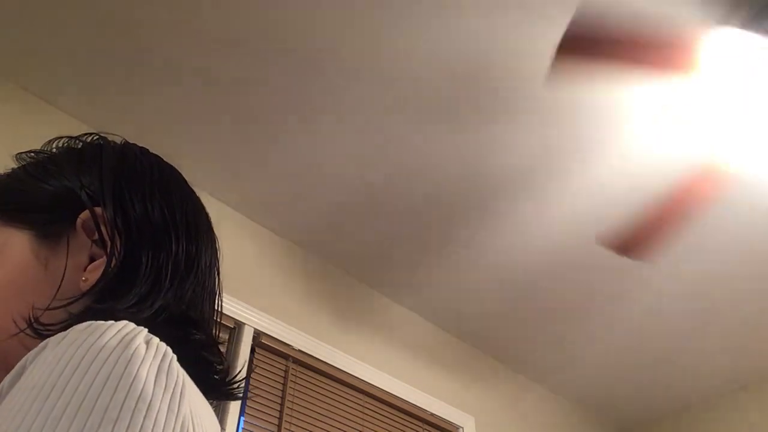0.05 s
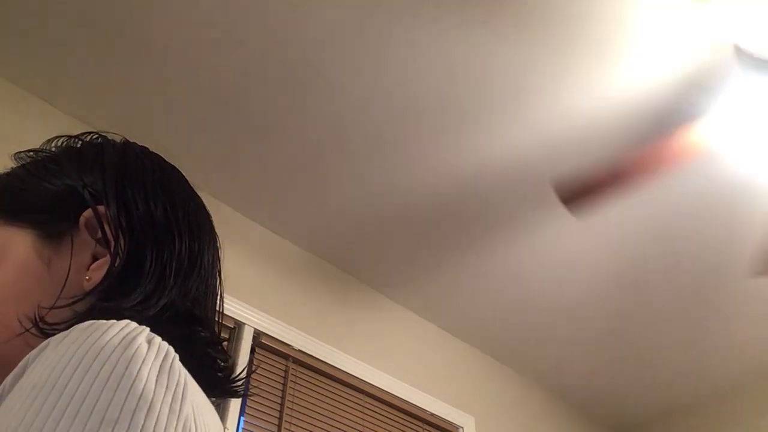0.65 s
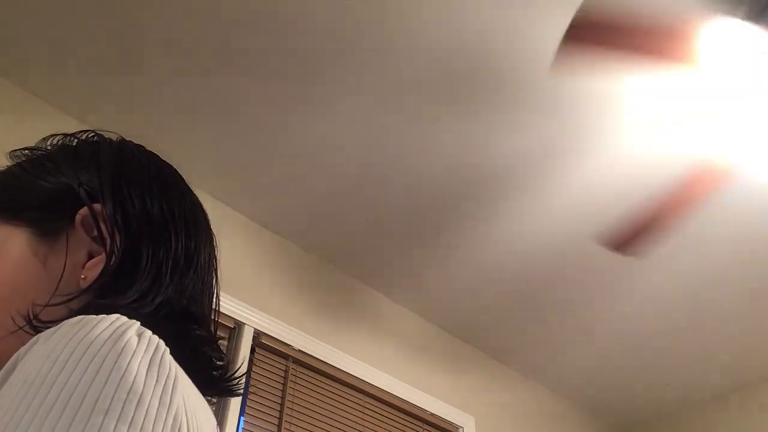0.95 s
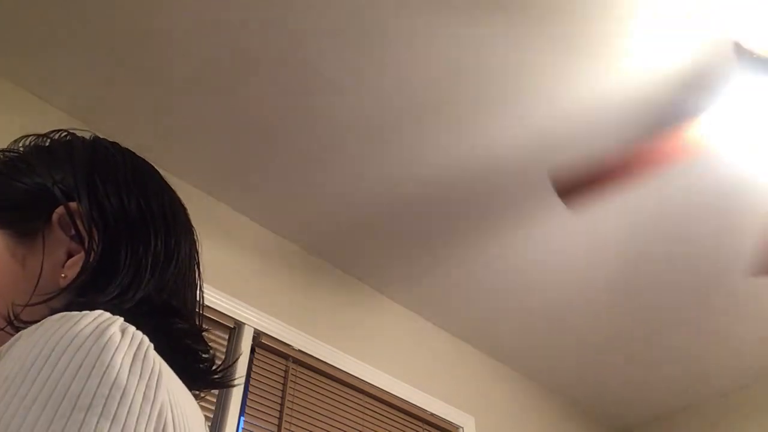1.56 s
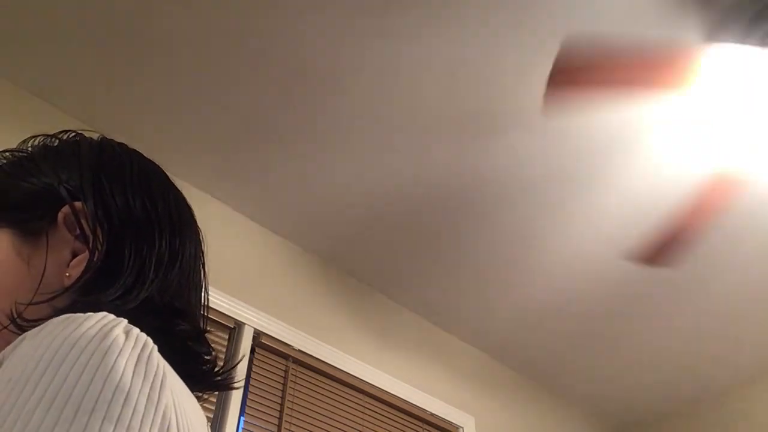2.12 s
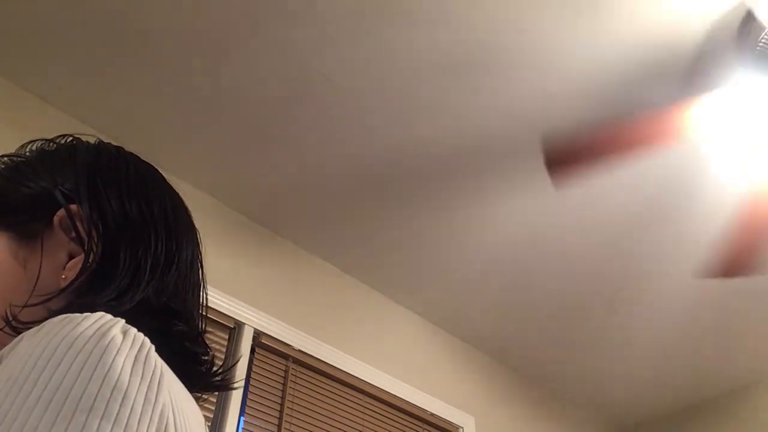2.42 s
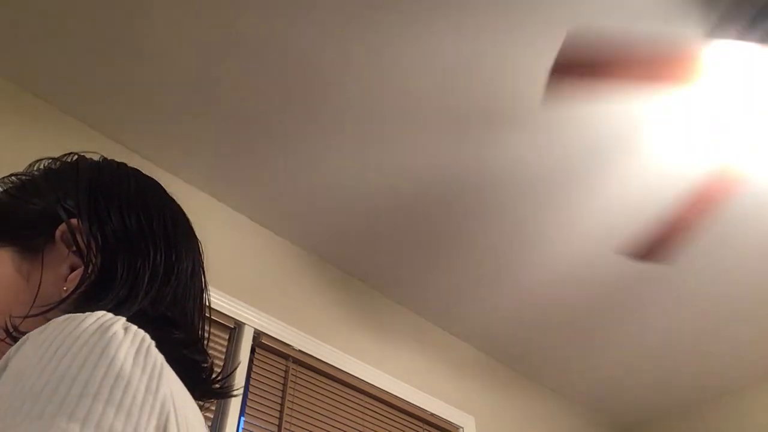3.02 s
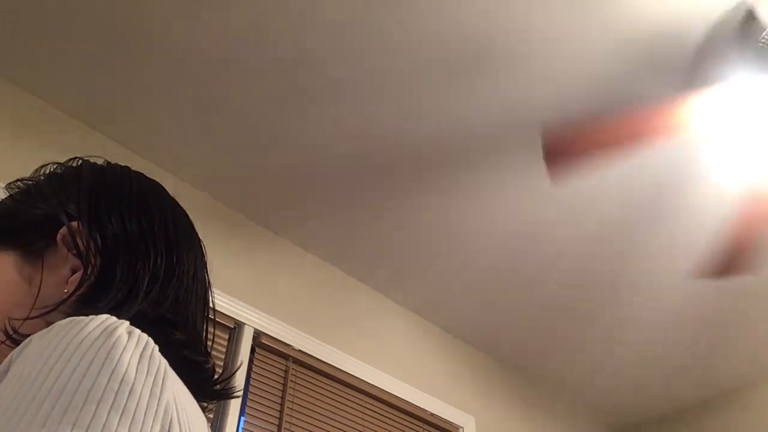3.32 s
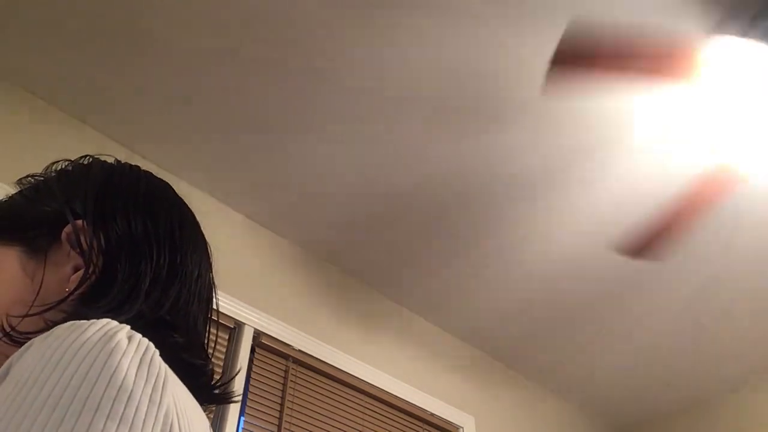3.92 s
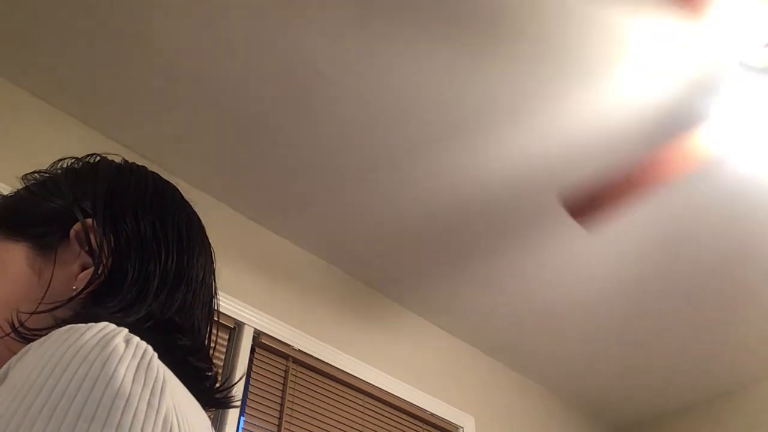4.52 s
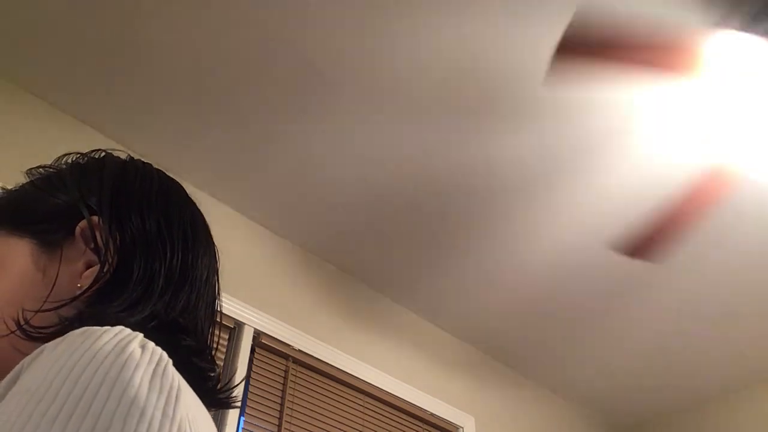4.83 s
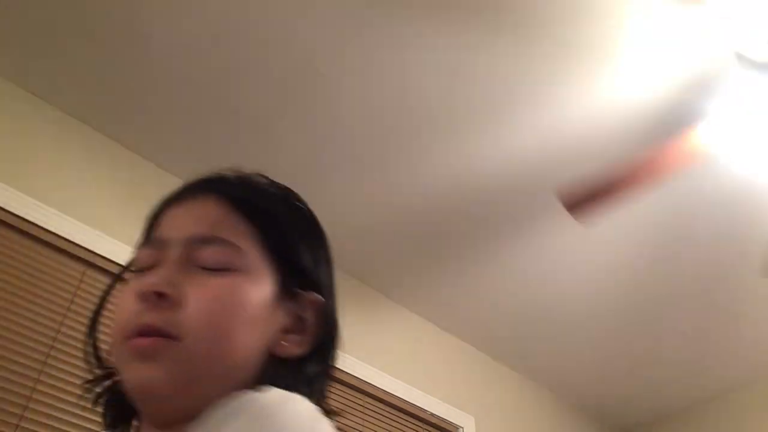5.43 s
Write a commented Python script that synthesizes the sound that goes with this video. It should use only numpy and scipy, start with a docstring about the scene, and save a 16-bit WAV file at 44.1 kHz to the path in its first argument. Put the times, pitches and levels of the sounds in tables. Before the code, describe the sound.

Over the faint hum and moving air of a ceiling fan, someone picks through plastic markers near the microphone. After one sharp click come irregular clusters of clicking and clattering, mixed with hollow knocks on a tabletop and soft scrapes of plastic on plastic. The handling thins out, ending with a dull rustle of clothes and a final click. The small room adds a short reverberation.

```python
"""Plastic markers are sorted in a small room; a ceiling fan hums faintly throughout.
A sharp click opens, then barrels and caps click together in bunches as the markers are picked up.
From 0.5 s to 5.1 s some knock on the table, which thuds hollowly; light slides and ticks fall between.
From 5.3 s someone turns round with a dull shuffle of clothes, and one last click follows."""
import sys
import numpy as np
from scipy import signal
from scipy.fft import rfft, irfft, next_fast_len
from scipy.io import wavfile

SR = 44100
rng = np.random.default_rng(int(sys.argv[2]) if len(sys.argv) > 2 else 0)


def file_out(sig):
    """Save sig as 16-bit WAV at sys.argv[1]."""
    # one column per channel
    cols = np.atleast_2d(sig).T
    # limit, then scale
    lim = np.clip(cols, -1, 1)
    pcm = np.round(lim * 32767).astype(np.int16)
    wavfile.write(sys.argv[1], SR, pcm)


N = 249606

# marker contacts: (time [s], cap level [dB], sharpness: cap over barrel [dB])
CONTACTS = [(.005, -31, 13.5), (.218, -46, -6), (0.24, -52, 9), (0.346, -48.5, 18), (.441, -60, 6),
            (.479, -58.5, 6), (0.509, -57.5, 9), (0.543, -80, -25.5), (.598, -52.5, -11.5), (.617, -41, 5),
            (0.628, -37.5, 10), (.672, -45.5, 1), (.718, -44.5, 1.5), (0.795, -39.5, 15), (.806, -34.5, 12),
            (0.81, -49.5, -4.5), (1.003, -39.5, 19), (1.07, -45, 3.5), (1.189, -43.5, -3.5),
            (1.208, -49.5, 9), (1.224, -47, -11.5), (1.238, -44.5, 0), (1.263, -52, -15),
            (1.398, -54.5, -4.5), (1.502, -45.5, 10.5), (1.652, -55, 19), (1.683, -48, 15),
            (1.693, -36, -0.5), (1.696, -34.5, 9), (1.706, -43, 9), (1.739, -43.5, 29), (1.759, -47, -10.5),
            (1.791, -30, 1), (1.822, -41.5, 15), (1.853, -36, 4), (1.866, -39.5, 20), (1.906, -44.5, 4),
            (1.938, -42.5, 3), (2.003, -56.5, -10.5), (2.03, -40, -1), (2.047, -48.5, -11.5),
            (2.08, -43, 21), (2.147, -45.5, -1), (2.303, -78, -28.5), (2.362, -48, -4.5), (2.369, -46, 44),
            (2.385, -45.5, -1.5), (2.501, -46, 12), (2.535, -34.5, 8), (2.551, -37, 10), (2.682, -46, 12),
            (2.698, -45.5, 22), (2.928, -45.5, -5), (2.939, -43, 0.5), (2.985, -45, 3), (3.03, -38, 1.5),
            (3.061, -30.5, 5.5), (3.123, -31, 4), (3.244, -50, 11), (3.254, -48, -5.5),
            (3.279, -52.5, -11.5), (3.35, -64, -14), (3.393, -42.5, -1), (3.442, -51, 0),
            (3.5, -45.5, -2.5), (3.562, -42.5, 0), (3.578, -46.5, 16), (3.717, -45, -2), (3.777, -43.5, -1),
            (3.857, -47, 25), (3.926, -45.5, 5), (3.974, -43, 13), (4.024, -53, -3.5), (4.09, -55.5, 1.5),
            (4.22, -56.5, -0.5), (4.28, -61.5, -6), (4.317, -38, 6), (4.325, -44.5, -3), (4.349, -57, 1),
            (4.403, -48, 5.5), (4.489, -59.5, -1), (4.582, -45.5, 2), (4.608, -40.5, 8), (4.68, -40.5, 8.5),
            (4.805, -64, -6), (4.822, -47, -0.5), (4.837, -42, -0.5), (5.145, -48, 7.5), (5.188, -49.5, -2),
            (5.636, -45.5, 10)]
# ringing ranges of barrel, cap, edge: (low [Hz], high [Hz])
PART_BANDS_HZ = [(550, 2000), (2000, 5500), (5500, 15500)]
# marker modes: (frequency [Hz], level [dB], t60 [s])
MARKER_MODES = [(660, -9, 0.017), (837, -9.5, 0.048), (1118, -6, 0.063), (1356, 0, 0.038), (1693, 4, 0.029),
                (2212, 1, 0.013), (2710, 2.5, 0.016), (3210, -4, 0.033), (4125, 0.5, 0.017),
                (4570, -18.5, 0.076), (5520, 0, 0.0015), (6575, -0.5, 0.014), (8800, -0.5, 0.0083),
                (11670, 1, 0.0054)]
# knocks on the table: (time [s], level [dB], hardness [dB/octave])
TABLE_KNOCKS = [(.005, -48, -14), (0.544, -47, 9), (.722, -43.5, 12), (.794, -45, 8.5), (1.019, -52, -0.5),
                (1.225, -48.5, 6.5), (1.262, -36.5, 16), (1.697, -44.5, 0), (1.758, -29, 7),
                (1.851, -44.5, -18), (1.906, -43, 1), (2.086, -45.5, -8), (2.365, -48.5, 1.5),
                (2.545, -48.5, -1.5), (2.94, -38.5, -12), (2.983, -54, -6), (3.028, -40, -2),
                (3.061, -38, 4), (3.16, -45, 4), (3.254, -40, -2), (3.315, -42, -6), (3.441, -48.5, 0),
                (3.502, -46.5, -3.5), (3.562, -36.5, 0.5), (3.585, -46, 6), (3.728, -53, 4.5),
                (3.85, -49, -2), (3.928, -52, -2.5), (4.318, -41, -1), (4.35, -44, -3.5), (4.398, -44.5, 7),
                (4.582, -40, 1), (4.836, -40, 6), (4.873, -47.5, 11), (5.135, -47, -1.5)]
# table top modes: (frequency [Hz], level [dB], t60 [s])
TABLE_MODES = [(116.4, -6, 0.32), (144, -13, 0.15), (163.5, 2.5, 0.1), (199, -7.5, 0.13), (237.2, 2, 0.12),
               (301, -4, 0.093), (360.7, -2.5, 0.073), (473, -10.5, 0.045), (573, -3, 0.041),
               (670, -6.5, 0.032), (916, -0.5, 0.014)]
# sliding strokes: (start [s], hold [s], level [dB])
SLIDE_STROKES = [(.01, 0.01, -47), (0.243, 0.094, -65.5), (0.884, .37, -60.5), (1.707, 0.22, -50.5),
                 (2.053, 0.053, -52.5), (2.55, 0.035, -54.5), (2.993, 0.16, -50.5), (3.263, 0.034, -51.5),
                 (3.401, 0.2, -54.5), (3.733, 0.14, -55.5), (4.199, 0.016, -61), (4.337, 0.06, -53),
                 (4.6, 0.12, -53.5), (4.829, 0.0088, -55), (5.15, 0.067, -59)]
# scrape spectrum: (frequency [Hz], density [dB])
SLIDE_SPECTRUM = [(200, -39), (500, -3), (1000, -1.5), (2500, 3.5), (4500, -5.5), (7000, -8),
                  (10000, -18.5), (12500, -15), (16000, -70)]
# body shifting in its seat: (time [s], level [dB])
CLOTH_ENVELOPE = [(5.3, -76), (5.39, -65), (5.46, -55), (5.55, -58), (5.69, -48.5)]
# cloth spectrum: (frequency [Hz], density [dB])
CLOTH_SPECTRUM = [(50, -25), (110, -2), (250, -7), (400, -13), (620, -11), (1000, -21), (2000, -28),
                  (6000, -45)]
# fan air spectrum: (frequency [Hz], density [dB])
AIR_SPECTRUM = [(25, -9), (60, 6.5), (120, 7), (250, 7), (400, 0), (800, -13), (2000, -11.5), (4000, -13),
                (7000, -19), (12000, -24.5), (16000, -47)]
# room reverberation: (frequency [Hz], t60 [s], gain [dB])
ROOM_DECAY = [(120, 0.92, -2), (295, 0.31, 10), (875, 0.39, -2.5), (1970, 0.3, -4), (5000, 0.29, 0),
              (11200, 0.31, 2)]


def marker_clicks():
    """Each contact grazes, then strikes; microphone and walls receive different mixes of its modes."""
    out = np.zeros(N)
    filters = [signal.butter(3, band_hz, "bandpass", fs=SR, output="sos") for band_hz in PART_BANDS_HZ]
    for time_s, cap_db, sharpness_db in CONTACTS:
        barrel_db, edge_db = cap_db - sharpness_db, cap_db - 10.5 + 0.31 * sharpness_db
        levels_db = [barrel_db, cap_db, edge_db]
        graze_s = time_s - rng.uniform(0.00092, 0.0045)
        add(out, graze_s, amp(-14) * contact(levels_db, filters))
        add(out, time_s, early_reflections(contact(levels_db, filters), echo_db=-18))
        for wall in range(2):
            add(out, time_s, amp(-3) * reverb(contact(levels_db, filters)))
    return out


def contact(levels_db, filters):
    """Surfaces chatter briefly; barrel, cap and edge ring. Soft contacts favour the low modes."""
    t = np.arange(SR // 25) / SR
    tilt_db_oct = 0.57 * np.clip(levels_db[1] - levels_db[0], -25, 0)
    chatter = amp(-60 * np.maximum(t - 0.0014, 0) / 0.0089)
    rise = 1 - np.exp(-t / 0.00028)
    click = np.zeros(len(t))
    for level_db, (low_hz, high_hz), bandpass in zip(levels_db, PART_BANDS_HZ, filters):
        modes = [mode for mode in MARKER_MODES if low_hz <= mode[0] < high_hz]
        tone = ring(modes, t, tilt_db_oct, detune=0.053, scatter_db=1.5, flip_chance=0.5)
        crack = unit(signal.sosfilt(bandpass, rng.standard_normal(len(t)) * chatter))
        click += amp(level_db - 9.5) * unit((tone + amp(-3) * crack) * rise)
    return click


def table_thuds():
    """Knocks and, faintly, barrel clacks drive the table top. Hard blows are shorter and drier."""
    out, t = np.zeros(N), np.arange(SR // 5) / SR
    nudges = [(time_s, cap_db - sharpness_db - 13, -1) for time_s, cap_db, sharpness_db in CONTACTS]
    for time_s, level_db, hardness_db_oct in TABLE_KNOCKS + nudges:
        tightness = max(hardness_db_oct, 0)
        modes = [(hz, db, t60_s / (1 + 0.23 * tightness)) for hz, db, t60_s in TABLE_MODES]
        blow = amp(level_db - 8.5) * (1 - np.exp(-t / 0.0013))
        direct = blow * ring(modes, t, hardness_db_oct, detune=0.033, scatter_db=-1, flip_chance=0.16)
        to_walls = blow * ring(modes, t, hardness_db_oct, detune=0.036, scatter_db=1, flip_chance=0.44)
        add(out, time_s, direct)
        add(out, time_s, amp(-1.5 - 0.28 * tightness) * reverb(to_walls))
    return highpass(out, cutoff_hz=90)


def marker_slides(catches_per_s=200, snap_t60_s=0.012):
    """Plastic rubs on plastic: a soft scrape with many tiny catches."""
    catches = (rng.random(N) < catches_per_s / SR) * rng.standard_normal(N)
    snap_t = np.arange(SR // 200) / SR
    snap = rng.standard_normal(len(snap_t)) * amp(-60 * snap_t / snap_t60_s)
    grain_power = np.abs(signal.fftconvolve(catches ** 2, snap ** 2)[:N])
    grains = unit(rng.standard_normal(N) * np.sqrt(grain_power))
    scrape = stroke_envelope() * coloured(grains + 0.73 * rng.standard_normal(N), SLIDE_SPECTRUM)
    return scrape + amp(-3.5) * reverb(scrape)[:N]


def stroke_envelope(attack_s=0.029, fade_db_per_s=197):
    """Each stroke swells, holds while the hand moves, then fades."""
    t, gain = np.arange(N) / SR, np.zeros(N)
    for start_s, hold_s, level_db in SLIDE_STROKES:
        swell = np.clip(1 + (t - start_s) / attack_s, 0, 1)
        fade_db = fade_db_per_s * np.maximum(t - start_s - hold_s, 0)
        gain = np.maximum(gain, swell * amp(level_db - fade_db))
    return gain


def cloth_shuffle():
    """Clothes rub dully on the seat as the body turns."""
    level_db = np.interp(np.arange(N) / SR, *np.transpose(CLOTH_ENVELOPE), left=-120, right=-120)
    return amp(level_db) * coloured(rng.standard_normal(N), CLOTH_SPECTRUM)


def ceiling_fan(hum_hz=119.5, level_db=-61.5):
    """Moving air plus motor hum."""
    air = coloured(rng.standard_normal(N), AIR_SPECTRUM)
    hum = np.sin(2 * np.pi * hum_hz * np.arange(N) / SR)
    return amp(level_db) * (air + hum)


def early_reflections(x, echo_db):
    """Direct sound plus six echoes off nearby objects."""
    response = np.zeros(SR // 50)
    delays_s = rng.uniform(0.003, 0.014, size=6)
    response[(delays_s * SR).astype(int)] = amp(echo_db) * rng.choice([-1, 1], size=6)
    response[0] = 1
    return signal.fftconvolve(x, response)


def reverb(x, build_s=0.0038):
    """Diffuse room tail, new for each place and direction."""
    hz, t, noise = signal.stft(rng.standard_normal(SR // 2), SR, nperseg=256)
    decay = amp(-60 * t / along(ROOM_DECAY, hz)[:, None])
    energy = np.mean(decay ** 2, axis=1, keepdims=True) * SR / 2
    decay *= amp(along(ROOM_DECAY, hz, column=2))[:, None] / np.sqrt(energy)
    tail = signal.istft(noise * decay, SR, nperseg=256)[1]
    rise = 1 - np.exp(-np.arange(len(tail)) / SR / build_s)
    return signal.fftconvolve(x, tail * rise)


def ring(modes, t, tilt_db_oct, detune, scatter_db, flip_chance):
    """Damped modes at rms 1; pitch, level and sign vary with where the blow lands."""
    hz, db, t60_s = np.transpose(modes)[:, :, None]
    pitch_draw, level_draw = rng.standard_normal((2, len(modes), 1))
    sign = np.where(rng.random((len(modes), 1)) < flip_chance, -1, 1)
    level_db = db + tilt_db_oct * np.log2(hz / hz[0]) + scatter_db * level_draw
    sines = np.sin(2 * np.pi * hz * np.exp(detune * pitch_draw) * t)
    return unit(np.sum(sign * amp(level_db - 60 * t / t60_s) * sines, axis=0))


def amp(db):
    return 10 ** (np.asarray(db) / 20)


def unit(x):
    return x / np.sqrt(np.mean(x ** 2) + 1e-20)


def along(rows, hz, column=1):
    """Table column interpolated over log frequency."""
    columns = np.transpose(rows)
    return np.interp(np.log(hz + 1), np.log(columns[0] + 1), columns[column])


def highpass(x, cutoff_hz):
    return signal.sosfilt(signal.butter(2, cutoff_hz, "highpass", fs=SR, output="sos"), x)


def filtered(x, gain_at_hz):
    size = next_fast_len(N + 8192)
    return irfft(rfft(x, size) * gain_at_hz(np.fft.rfftfreq(size, 1 / SR)), size)[:N]


def coloured(x, spectrum):
    """x shaped by a spectrum, at rms 1."""
    return unit(filtered(x, lambda hz: amp(along(spectrum, hz))))


def add(track, time_s, sound):
    start = int(np.clip(round(time_s * SR), 0, N - 1))
    track[start:start + len(sound)] += sound[:N - start]


def scene():
    return (marker_clicks() + table_thuds() + marker_slides() + cloth_shuffle() + ceiling_fan())[None]


def record(dry):
    """Microphone: deep bass rolled off, nothing above 15.8 kHz."""
    return filtered(highpass(dry[0], cutoff_hz=60), lambda hz: hz < 15800)[None]


dry = scene()
out = record(dry)
file_out(out)
```